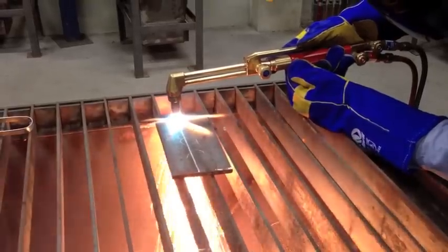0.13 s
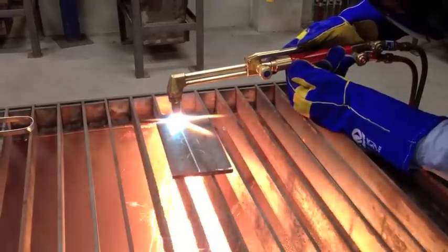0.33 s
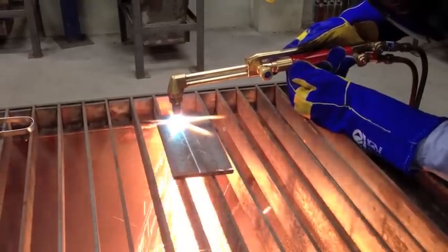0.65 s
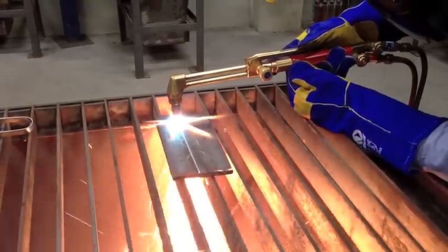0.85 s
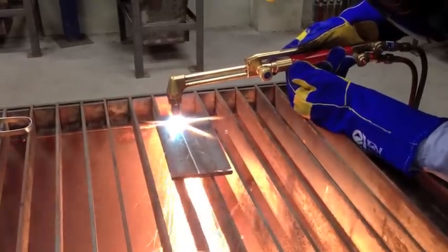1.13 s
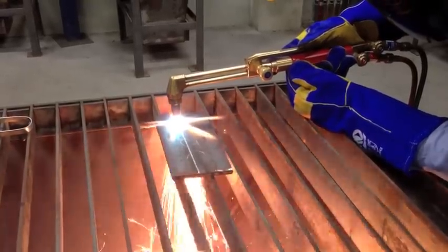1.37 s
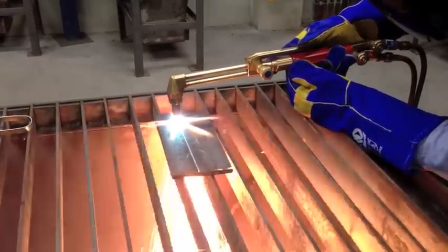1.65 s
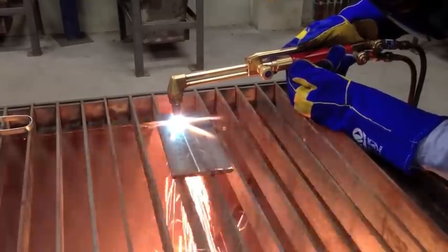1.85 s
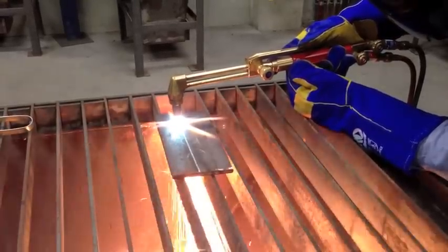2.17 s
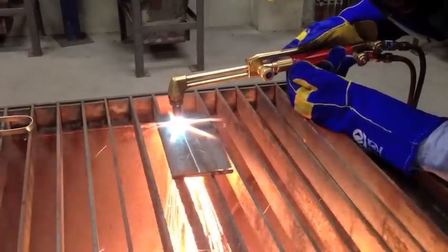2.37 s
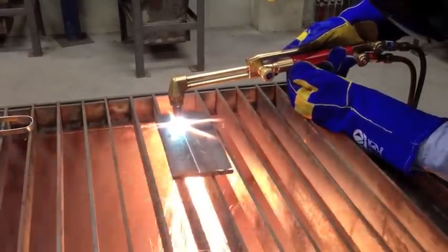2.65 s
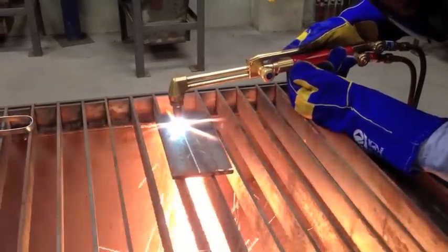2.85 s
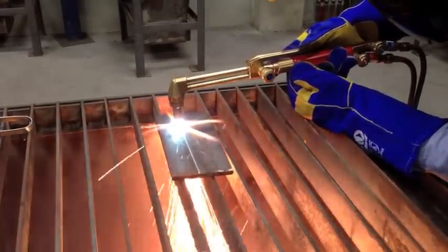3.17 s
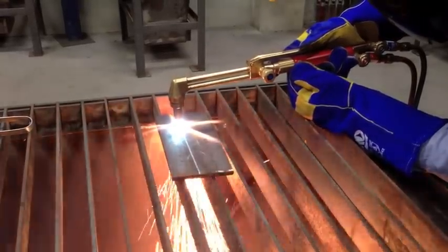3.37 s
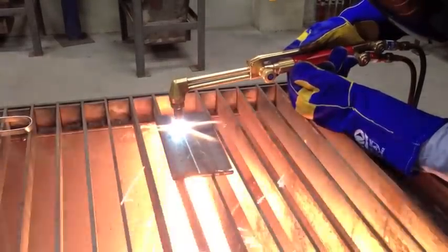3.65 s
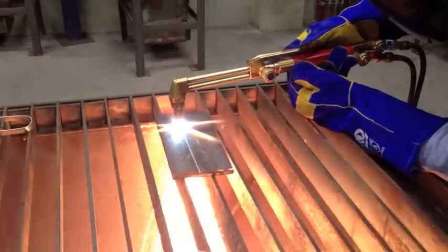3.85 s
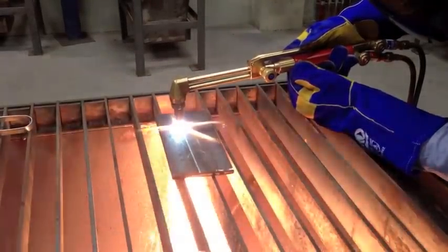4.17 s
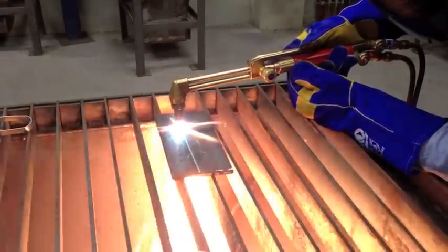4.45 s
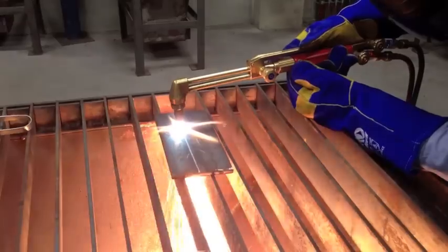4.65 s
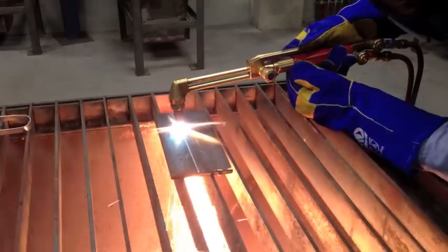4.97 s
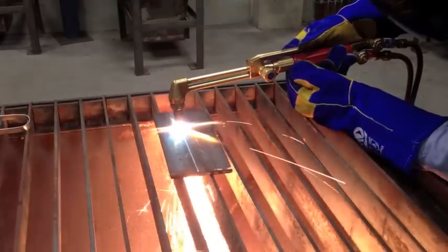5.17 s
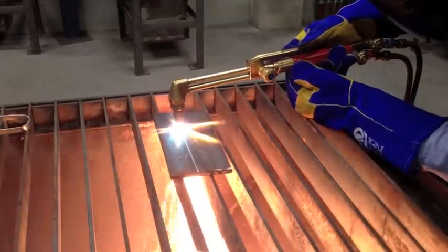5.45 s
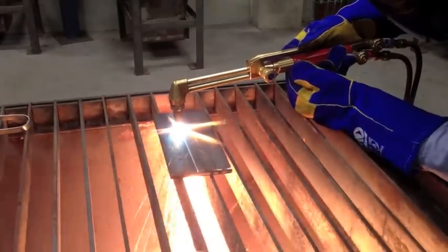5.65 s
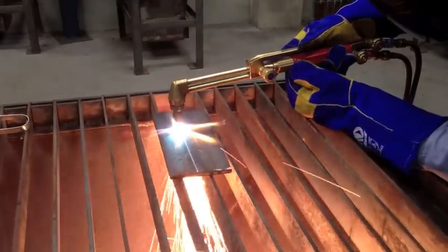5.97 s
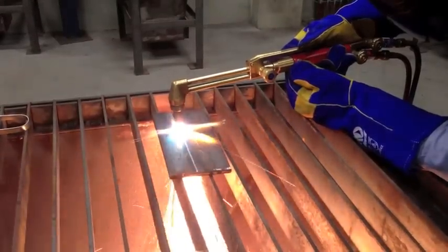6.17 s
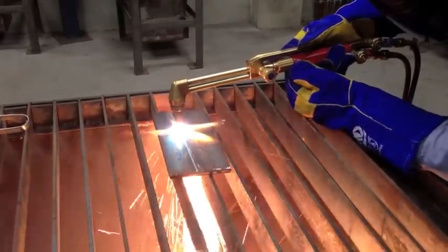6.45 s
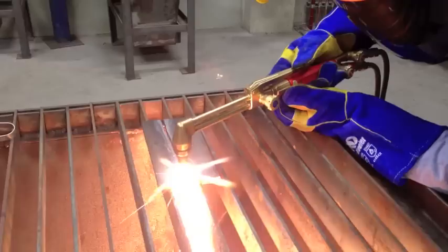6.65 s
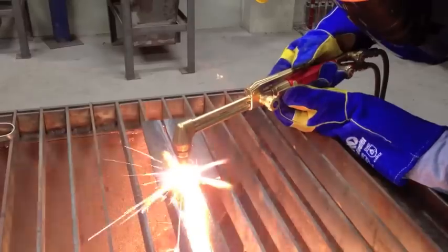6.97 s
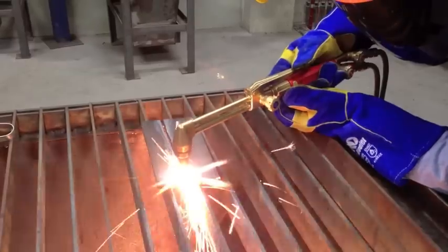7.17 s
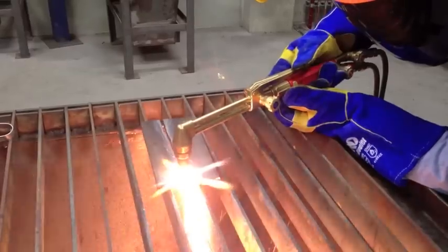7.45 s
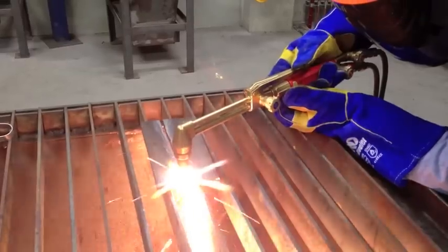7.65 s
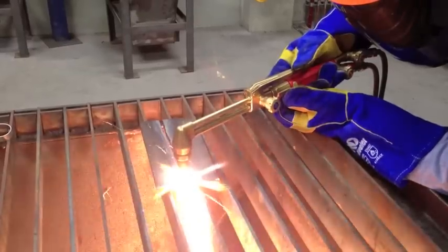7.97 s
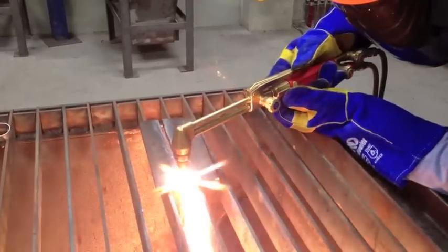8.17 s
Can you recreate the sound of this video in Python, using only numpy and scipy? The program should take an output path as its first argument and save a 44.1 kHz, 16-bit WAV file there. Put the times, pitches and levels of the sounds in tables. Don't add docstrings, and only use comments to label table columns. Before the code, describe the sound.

A cutting torch hisses loudly and steadily as it burns through steel plate, slag roaring underneath, with one brief dip to silence near the end.

```python
import sys
import numpy as np
from scipy import signal
from scipy.fft import rfft, irfft
from scipy.io import wavfile
from scipy.ndimage import uniform_filter1d

SR = 44100
rng = np.random.default_rng(int(sys.argv[2]) if len(sys.argv) > 2 else 0)


def generate_wav(sig):
    pcm = np.round(np.clip(np.atleast_2d(sig).T, -1, 1) * 32767).astype(np.int16)
    wavfile.write(sys.argv[1], SR, pcm)


def gain_from_decibels(decibels):
    exponent = np.asarray(decibels, float) / 20
    return 10 ** exponent


N = 366912


def read(points, hz):
    f, value = np.transpose(points)
    return np.interp(np.log(hz + 1), np.log(f + 1), value)


def evened(x):
    return x / np.sqrt(np.mean(x ** 2) + 1e-20)


def blurred(shape, bins, frames):
    z = rng.standard_normal(shape)
    for _ in range(2):
        z = uniform_filter1d(z, max(round(frames), 1), 0)
        z = uniform_filter1d(z, max(round(bins), 1), 1)
    return evened(z).T


def bump(t, middle, length):
    return 1 / (1 + (2 * (t - middle) / length) ** 4)


def standing_db(modes, hz):
    return sum(db * bump(hz, f, width) for f, width, db in modes)


# pitch_hz, width_hz, level_db
HUM = [
    (382.9, 9.9, -53),
    (323, 30, -56.5),
    (272, 20, -59.5),
    (195, 25, -63.5),
    (135.7, 14, -72),
]


def extractor(steady=.35):
    hz = np.fft.rfftfreq(N, 1 / SR)
    out = np.zeros(N)
    for f, width, db in HUM:
        spectrum = rfft(rng.standard_normal(N)) * bump(hz, f, width)
        band = irfft(spectrum, N)
        swell = np.sqrt(abs(uniform_filter1d(band ** 2, size=9000)) + 1e-20)
        out += gain_from_decibels(db) * evened(band / swell ** steady)
    return out


# first_s, t60_s, level_db
SHOP = (.003, .14, -12.)


def shop(x, drift_s=5.5):
    first, t60, db = SHOP
    t = np.arange(SR // 4) / SR
    tails = rng.standard_normal((3, len(t))) * gain_from_decibels(-60 * t / t60) * (t > first)
    phase = np.arange(N) / SR / drift_s + np.arange(3)[:, None] / 3
    turn = np.sqrt(2 / 3) * np.cos(np.pi * phase)
    wet = np.zeros(N)
    for weight, tail in zip(turn, tails):
        wet += signal.oaconvolve(x * weight, tail / np.linalg.norm(tail))[:N]
    return (x + gain_from_decibels(db) * wet) / np.sqrt(1 + gain_from_decibels(2 * db))


# pitch_hz, level_db (per Hz)
FAR_EDGE = [(135, -21), (240, -20.5), (374, -11), (430, -18.5), (662, -13), (850, -8), (1090, -10.5),
            (1600, -4), (4000, -5), (6500, -8), (8500, -11.5), (12000, -11), (15300, -11)]
NEAR_EDGE = [(135, -17.5), (261, -11.5), (374, -11.5), (430, -15.5), (560, -11.5), (990, -8.5),
             (1280, -10.5), (1600, -6.5), (2800, -4.5), (4150, -0.5), (7500, -6), (11000, -9),
             (13500, -10.5), (15300, -9)]
# pitch_hz, width_hz, level_db
START = [(1290, 210, 7), (1980, 220, 4), (2260, 107, 2), (2600, 100, 4.5), (3095, 130, 5.5),
         (3300, 150, 6.5), (3886, 200, 6), (4160, 250, 2), (4790, 130, 3), (5120, 140, 1.5),
         (5560, 100, 2.5), (6750, 530, 1.8), (1080, 130, -2.5), (14100, 800, 4)]
QUARTER = [(1280, 180, 7.7), (1965, 320, 5.2), (2300, 148, 2.1), (2630, 170, 3.3), (3250, 320, 4.3),
           (3930, 100, 5), (4160, 170, 2.5), (4750, 180, 2.5), (5550, 190, 2.6), (9900, 580, 3.1),
           (10700, 280, 3.1), (11400, 130, 3.3), (11900, 190, 2.9), (13100, 153, 4.3)]
HALF = [(1270, 320, 9.4), (1755, 99, 5.7), (1970, 86, 1.9), (2400, 130, 1.7), (800, 63, 1.7),
        (4180, 170, 3.4), (4930, 710, 2), (5480, 200, 2.0), (6100, 400, 1.7), (6880, 340, 2.2),
        (7660, 180, 1.5), (8570, 100, 1.3), (10200, 540, 1.9), (11950, 396, 1.5)]
END = [(974, 140, 3.8), (1440, 230, 3), (1765, 100, 4), (2040, 130, 3.5), (2580, 180, 3.9),
       (3280, 300, 3.8), (4210, 100, 2.1), (5080, 130, 3.4), (5420, 120, 2.5), (5850, 230, 3),
       (6540, 212, 2.2), (755, 68, 2.6), (9850, 300, 2.5), (3540, 250, 1.5)]
# middle_s, length_s
MOVES = [
    (2.25, .3),
    (3.65, .15),
    (6.738, .01),
]
# middle_s, length_s, pitch_hz, width_hz, level_db
WHISTLES = [(.3, .8, 4830, 130, 3), (.7, 0.18, 900, 130, 1), (1.2, .35, 3360, 150, 2),
            (6.35, .7, 800, 150, 3), (0.78, .5, 1993, 80, 6.5), (1.7, .6, 2240, 150, 5),
            (2.4, .8, 2800, 350, -3), (2.6, .4, 5520, 150, 1), (4.3, .62, 890, 170, 5),
            (4.45, .18, 980, 500, 1), (4.2, 0.24, 1430, 170, 6.5), (4.11, 0.24, 3030, 250, 5),
            (4.2, .9, 4180, 150, 2), (3.42, 0.27, 3400, 1500, -0.5), (3.4, 0.46, 5600, 1100, -3),
            (4.25, 0.75, 2000, 130, 5), (4.9, 1.2, 6100, 220, 3.5), (5.0, .3, 6400, 200, 2),
            (5.5, 0.26, 1300, 200, -0.5), (3.8, .35, 6700, 200, 2), (2.9, .3, 1280, 200, 4),
            (5.2, 1.1, 3700, 250, -3.5), (6.1, 0.54, 2900, 340, 3), (6.35, .35, 5030, 200, 3.5),
            (6.4, .5, 7500, 700, 3.5), (7.15, .8, 2960, 300, -3), (7.2, .5, 4670, 540, -4),
            (7.3, .25, 5870, 150, 6), (8, 0.73, 4190, 140, 4.5), (7.93, 0.28, 1560, 310, 7.5),
            (7.95, .9, 3270, 400, 2), (5.8, .6, 2700, 130, 3), (6.45, .3, 3700, 1600, 1),
            (3.5, .25, 2350, 300, 2), (4.9, 0.55, 280, 660, -8.5), (2.76, .25, 500, 700, -1),
            (4.45, .7, 420, 300, 4)]
# middle_s, length_s, pitch_hz, width_hz, level_db
FIZZES = [(1.0, .45, 12400, 600, 1.5), (1.05, .3, 11050, 300, 5), (1.4, .3, 10850, 300, 5),
          (1.7, .8, 9020, 200, 6), (1.05, .5, 13100, 400, -2), (1.7, .9, 13550, 250, 1.5),
          (2.6, .45, 10250, 350, 3), (3.2, 1.0, 13300, 200, 2), (3.45, .5, 11550, 300, 5),
          (3.1, 1.2, 10600, 900, 2), (3.95, 0.34, 9500, 250, 6), (4.2, 0.48, 9720, 250, 7),
          (4.2, .25, 11950, 300, 5.5), (5.0, 0.83, 11150, 800, -3), (5.0, 1.3, 12600, 1800, -2.5),
          (5.95, .4, 12100, 500, 5), (6.43, 0.33, 13600, 2600, 3), (7.45, .3, 9700, 2200, 0.5)]


def colour_db(t, hz, slag, flutter=0.2):
    gone = [np.clip((t - s) / takes + .5, 0, 1) for s, takes in MOVES]
    share = -np.diff([np.ones_like(t)] + gone + [np.zeros_like(t)], axis=0)
    near = gone[2]
    field = np.outer(read(FAR_EDGE, hz), 1 - near) + np.outer(read(NEAR_EDGE, hz), near)
    for modes, weight in zip((START, QUARTER, HALF, END), share):
        ripple = standing_db(modes, hz)
        ripple = ripple - uniform_filter1d(ripple, size=40)
        field = field + np.outer(ripple, weight)
    broken = np.clip(1 + flutter * slag, 0, 2)
    for s, length, f, width, db in WHISTLES + FIZZES:
        field = field + broken * np.outer(standing_db([(f, width, db)], hz), bump(t, s, length))
    return field


# time_s, level_db
FLOW = [(0, 0), (1.25, 0.5), (1.45, 1), (1.62, -0.3), (2.2, -0.9), (2.55, 1.5), (2.8, 0.2), (3.5, 0.5),
        (4.2, 1), (4.65, -1.6), (4.9, 0.6), (5.7, -0.8), (6.4, 1.5), (6.62, -1), (7.25, -1), (7.45, 1.5),
        (7.75, -1.5), (8.32, -1)]
# time_s, level_db
SLAG = [(0, 2), (.45, -2.5), (.72, 0), (1.35, -2.5), (1.52, -0.9), (2.3, -3.5), (2.65, 0.2), (3.05, -1.8),
        (3.58, -2.5), (4.15, 5), (4.5, 4), (4.66, -0.7), (5.5, 3), (5.68, -1.2), (6.55, 1.5), (7.6, -4),
        (7.92, 3), (8.32, -2.5)]
# middle_s, level_db
SPITS = [(.07, -0.5), (1.15, 2), (1.85, 0.5), (2.05, 0.5), (2.82, -1), (3.33, 2.5), (3.8, 0.5),
         (4.36, -1.5), (4.93, 1), (5.2, 0.5), (6.25, -0.3), (6.93, -1), (7.12, 0.8), (7.4, -0.5),
         (8.12, -2.5), (8.25, 0.5)]
# mean_db, flow_share, slag_share, near_edge_db
FOLLOW = [
    (-26.5, 0.74, 0.13, 0.5),
    (-37.5, -0.039, 1.2, 0.3),
    (-34.5, 0.88, 0.64, 1.8),
    (-29.5, 0.94, -0.06, 0.7),
    (-43.5, -0.28, 0.12, -3.5),
]
LAYERS = ("jet", "roar", "rush", "fizz", "blast")
# middle_s, length_s, layer, level_db
SURGES = [(6.43, 0.23, "fizz", 1.5), (5, 0.2, "roar", 1), (4.2, .2, "roar", -0.5), (3.03, .25, "roar", 2.5),
          (3.58, 0.088, "rush", -2.5), (3.58, .1, "jet", -1), (4.1, 0.16, "jet", 0.5),
          (1.33, .08, "rush", 0), (1.4, 0.089, "jet", -1), (4.7, .1, "rush", -0.5), (4.7, .1, "jet", -1),
          (8.1, 0.34, "jet", 0), (7.35, .25, "blast", 0.5), (4.15, .6, "blast", 2), (6.4, 0.21, "jet", 0.5),
          (5.4, 0.27, "roar", -1)]


def layer_levels(t, spit_s=0.14):
    flow = np.interp(t, *np.transpose(FLOW))
    slag = np.interp(t, *np.transpose(SLAG))
    for s, db in SPITS:
        slag = slag + db * np.exp(-(2 * (t - s) / spit_s) ** 2)
    after_change = t > EDIT[0]
    levels = []
    for layer, (mean_db, flow_share, slag_share, near_db) in zip(LAYERS, FOLLOW):
        surge = sum(db * bump(t, s, length) for s, length, name, db in SURGES if name == layer)
        levels.append(mean_db + flow_share * flow + slag_share * slag + near_db * after_change + surge)
    return levels


# start_s, end_s, pitch_hz, width_hz, level_db
CATCHES = [(7.34, 7.62, 4210, 150, 5.5), (8.05, 8.32, 4200, 150, 2), (4.44, 4.54, 1270, 260, 4),
           (4.545, 4.62, 1500, 1200, -1.5), (4.14, 4.33, 1300, 500, -1.5), (6.57, 6.66, 1290, 220, 4),
           (6.33, 6.38, 2500, 3500, 1.2), (6.28, 6.33, 1300, 220, 3), (1.42, 1.48, 2300, 1600, 3),
           (1.44, 1.6, 1290, 200, 3), (5.14, 5.2, 2850, 500, 3), (6.76, 6.82, 2630, 200, 5),
           (3.3, 3.36, 1290, 220, 1.5), (5.42, 5.56, 1300, 200, 2), (4.8, 5.15, 1220, 250, -1.5),
           (5.58, 5.66, 1600, 1400, -1), (4.42, 4.48, 4180, 200, 3), (7.84, 7.92, 3280, 300, .6),
           (.63, .74, 900, 200, 2), (1.7, 1.75, 2200, 400, 3), (3.02, 3.08, 1550, 300, 3),
           (7.92, 8.0, 980, 250, 3), (0, .08, 2000, 700, 2), (7.5, 7.62, 3000, 900, -1.5),
           (4.95, 5.1, 4200, 300, -2), (6.58, 6.7, 4200, 400, -2), (7.05, 7.6, 5900, 1800, -1.2),
           (4.24, 4.3, 3800, 500, 2), (1.36, 1.5, 10000, 9000, 1), (1.2, 1.32, 3900, 200, -2),
           (1.3, 1.41, 3200, 1200, -.6), (5.75, 6.1, 2200, 800, 1.5), (3.37, 3.56, 3100, 1100, -1.5),
           (7.51, 7.6, 3300, 300, -2.5), (4.55, 5.4, 1180, 120, -1.5), (5.42, 5.52, 1550, 300, -2),
           (3.97, 4.06, 1500, 250, -3), (6.82, 7.3, 1760, 100, 2), (0, 1.1, 5150, 120, 2)]


def catches_db(t, hz, catch_s=.012):
    field = 0
    for start, end, f, width, db in CATCHES:
        held = np.clip(np.minimum(t - start, end - t) / catch_s + .5, 0, 1)
        field = field + np.outer(standing_db([(f, width, db)], hz), held)
    return field


# low_hz, centre_hz, high_hz
LAYER_HZ = [
    (3000, 5000, 8000),
    (800, 1250, 1650),
    (1650, 2200, 2800),
    (9000, 11500, 15200),
    (150, 350, 700),
]


def torch(streak_db=1.05, patch_db=.5, puff_db=0.65, sputter_db=0.5):
    frames, hz = N // 256 + 5, np.fft.rfftfreq(1024, 1 / SR)
    t = np.arange(frames) * 256 / SR
    echoes = blurred((frames, 513), 2.2, 59.0)
    slag = blurred((frames, 513), 13.0, 10.)
    field = colour_db(t, hz, slag)
    lifts = []
    for (lo, mid, hi), level_db in zip(LAYER_HZ, layer_levels(t)):
        band_power = np.sum(gain_from_decibels(field[(hz > lo) & (hz < hi)]) ** 2, 0)
        lifts.append((mid, level_db - 10 * np.log10(band_power)))
    for mid, lift in lifts:
        blend = read(sorted((m, m == mid) for m, _ in lifts), hz)
        field += np.outer(blend, lift)
    field += catches_db(t, hz)
    field += streak_db * echoes
    field += patch_db * slag
    field += puff_db * blurred((frames, 513), 106.0, 3.)
    a, b = rng.standard_normal((frames, 513, 2)).T
    spectra = (a + 1j * b) * gain_from_decibels(field + 1.5)
    noise = signal.istft(spectra, nperseg=1024, noverlap=768, scaling="spectrum")[1][:N]
    sputter = evened(uniform_filter1d(rng.standard_normal(N), 90))
    return noise * gain_from_decibels(sputter_db * sputter)


def scene():
    flame = torch()
    return np.tile(shop(flame) + extractor(), (2, 1))


# pitch_hz, level_db
MIC = [(20, -38), (50, -31), (80, -25), (105, -18), (122, -9), (133, 0)]


def camera(x, hole_db=-22.):
    hz, _, z = signal.stft(x, SR, nperseg=1024, noverlap=768)
    near = uniform_filter1d(abs(z) ** 2, size=3, axis=0)
    near = uniform_filter1d(near, size=10, axis=1)
    wide = uniform_filter1d(near, size=41, axis=0)
    weak_db = read([(900, -16), (1500, -9.5), (2600, -9.5), (4000, -7.5), (7000, -4.6),
                    (11000, -4.2), (14800, -2.7)], hz)
    weak = near < wide * gain_from_decibels(2 * weak_db)[:, None]
    keep = uniform_filter1d(np.where(weak, gain_from_decibels(hole_db), 1.), size=3, axis=1)
    x = signal.istft(z * keep, SR, nperseg=1024, noverlap=768)[1][:N]
    fine_hz = np.fft.rfftfreq(N, 1 / SR)
    top = np.clip((15345 - fine_hz) / 30, 0, 1)
    return irfft(rfft(x) * gain_from_decibels(read(MIC, fine_hz)) * top, N)


# middle_s, low_hz, width_hz
NOISE_FILLS = [(.644, 7580, 1380), (.667, 4220, 1460), (.737, 4220, 950), (.83, 11020, 2070),
               (1.294, 9650, 1380), (1.434, 6890, 2070), (1.434, 11020, 1380), (1.55, 4650, 1640),
               (1.55, 11020, 1380), (1.55, 13090, 1380), (1.968, 13090, 1380), (2.037, 12400, 1380),
               (2.362, 11710, 2070), (2.687, 7580, 1380), (2.827, 12400, 1380), (2.85, 8270, 1380),
               (3.013, 13090, 1380), (3.547, 6290, 1290), (4.127, 5680, 1900), (4.638, 4650, 1030),
               (4.777, 8270, 1380), (4.847, 11020, 2070), (4.917, 4650, 1030), (4.917, 11710, 2070),
               (5.613, 8270, 2070), (5.613, 13780, 1380), (5.683, 4220, 950), (5.683, 8960, 1380),
               (5.845, 5680, 1210), (5.845, 13780, 1380), (6.147, 4650, 2240), (6.147, 8270, 2760),
               (6.472, 4650, 1030), (6.472, 6890, 1380), (6.472, 9650, 1380), (6.658, 8270, 1380),
               (6.658, 10330, 1380), (6.821, 12400, 1380), (6.867, 11710, 2070), (6.983, 12400, 1380),
               (7.099, 7580, 2070), (7.169, 9650, 2070), (7.703, 8270, 1380), (7.703, 11710, 1380),
               (7.796, 4220, 950), (7.889, 4650, 1030)]


def noise_fill(x, fill_db=-2.5):
    first, hop = 757, 1024
    side, n = np.zeros(N), np.arange(2 * hop)
    window = signal.windows.kaiser_bessel_derived(2 * hop, 4 * np.pi)
    draws = rng.standard_normal((len(NOISE_FILLS), hop))
    for (s, lo, width), z in zip(NOISE_FILLS, draws):
        at = first + hop * (round((s * SR - first) / hop) - 1)
        span = slice(at, at + 2 * hop)
        lines = round(lo * 2 * hop / SR) + np.arange(round(width * 2 * hop / SR))
        cosines = np.cos(np.pi / hop * np.outer(lines + .5, n + .5 + hop / 2))
        basis = np.sqrt(2 / hop) * window * cosines
        strength = gain_from_decibels(fill_db) * np.std(basis @ x[span])
        side[span] += strength * z[lines] @ basis
    return side


def band_limit(x):
    return signal.sosfilt(signal.butter(12, 16400, fs=SR, output="sos"), x)


# middle_s, fade_out_s, fade_in_s
EDIT = (6.738, .072, .072)


def record(dry):
    s, out, back = EDIT
    fade = np.interp(np.arange(N) / SR, [s - out, s, s + back], [1, .002, 1])
    faded = camera(dry[0]) * fade
    side = noise_fill(faded)
    return band_limit(np.array([faded + side, faded - side]))


dry = scene()
out = record(dry)
generate_wav(out)
```